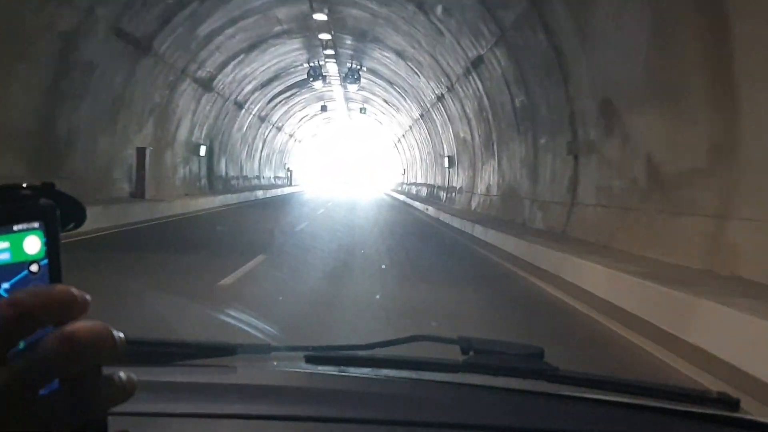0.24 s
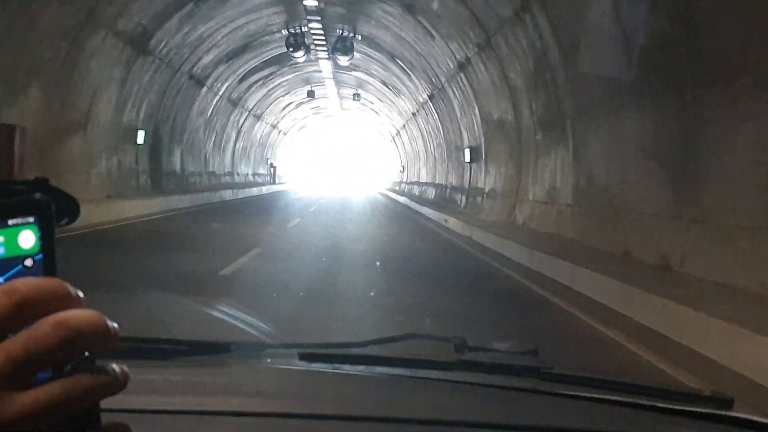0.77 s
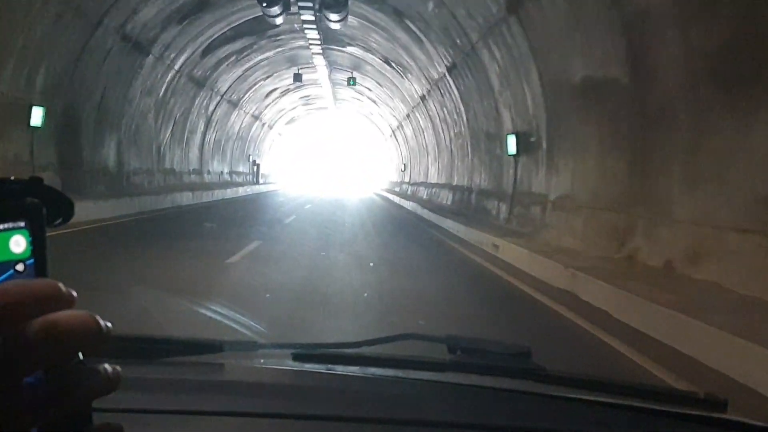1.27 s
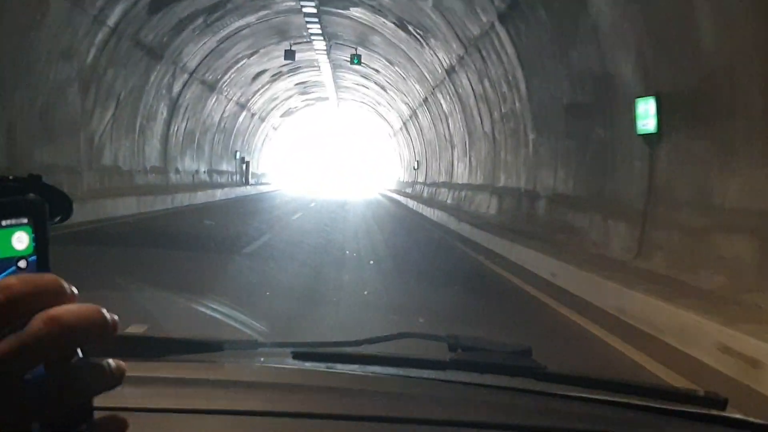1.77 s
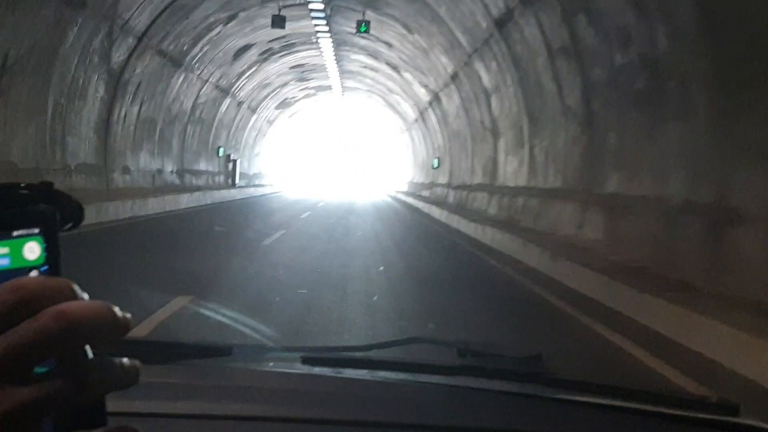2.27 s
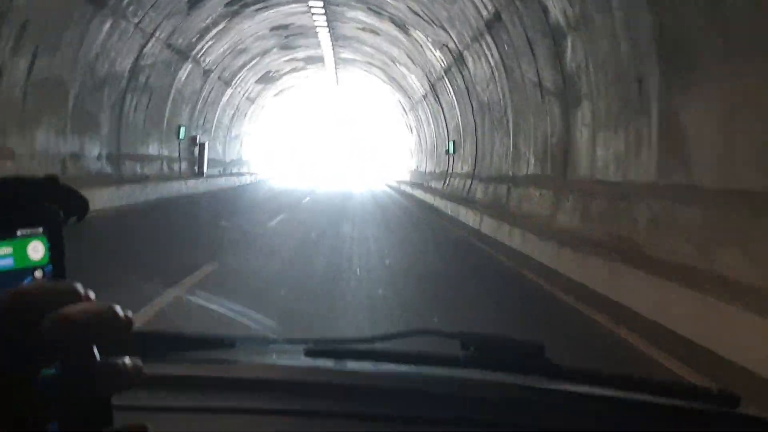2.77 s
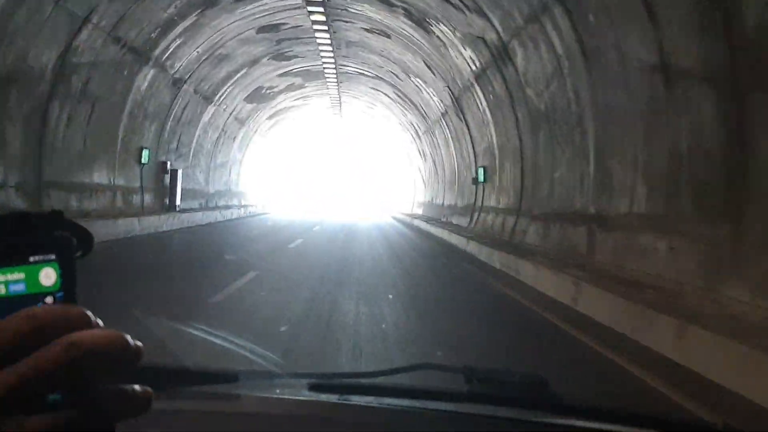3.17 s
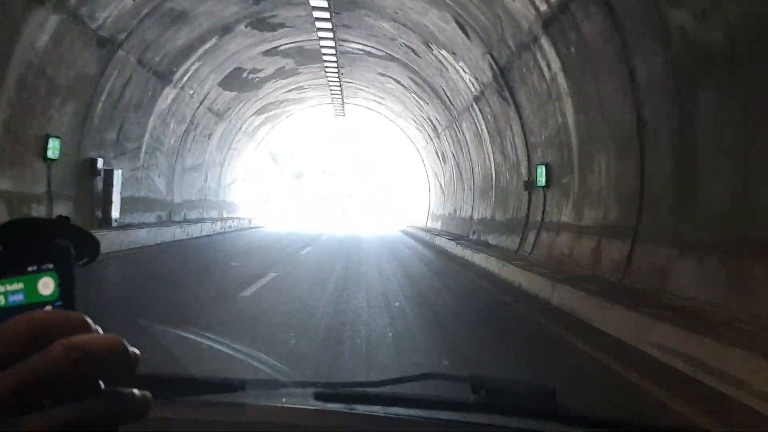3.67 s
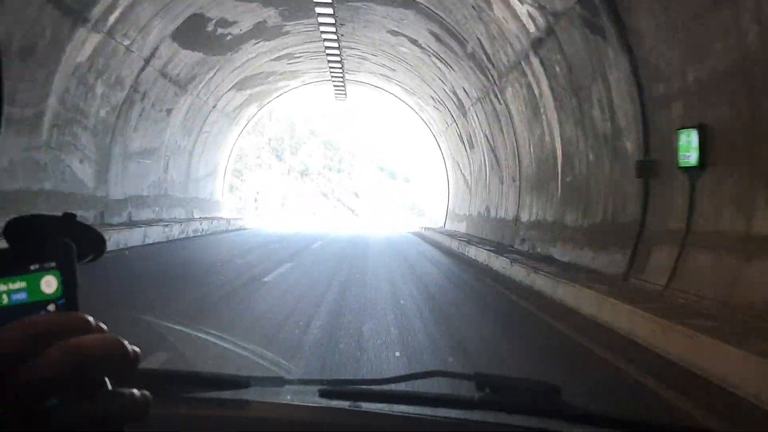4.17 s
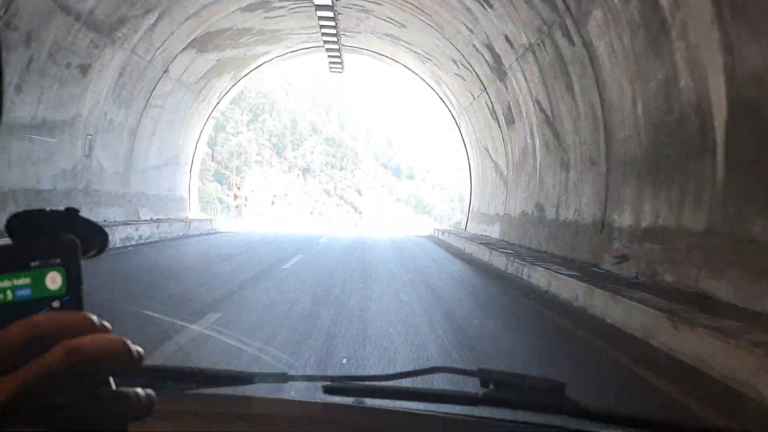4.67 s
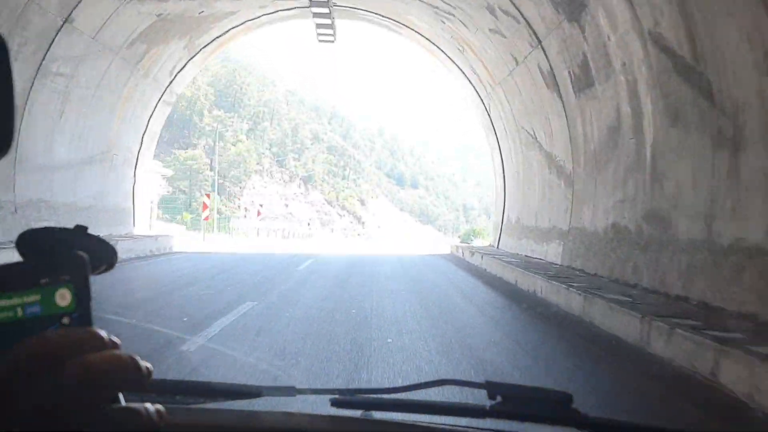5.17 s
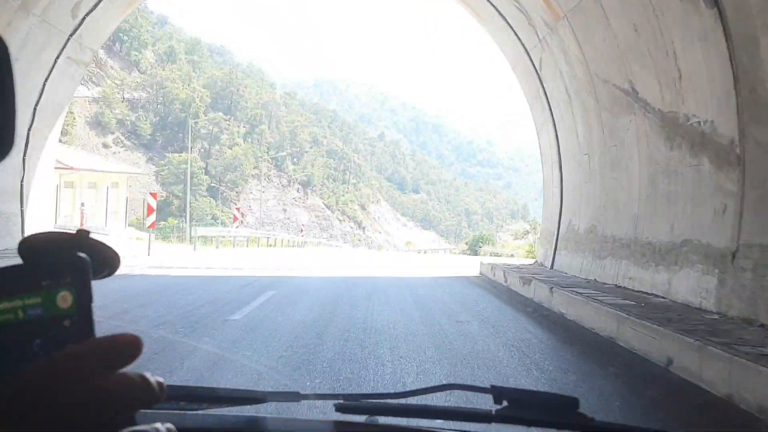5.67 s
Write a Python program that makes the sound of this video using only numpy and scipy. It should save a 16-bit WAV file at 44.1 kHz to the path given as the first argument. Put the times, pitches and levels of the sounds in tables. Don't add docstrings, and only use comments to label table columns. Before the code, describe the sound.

Inside a car in a concrete tunnel, a loud bass engine boom and tyre rumble dominate, with muffled roar and faint hiss. A tiny skin squeak comes early, then a loud dry snap on the right as the gripping hand shifts. Later the drone sinks and wavers among soft trim ticks. The overloaded stereo recorder is handheld in the cabin.

```python
import sys
import numpy as np
from scipy import signal
from scipy.io import wavfile
from scipy.ndimage import uniform_filter1d, minimum_filter1d

SR = 44100
rng = np.random.default_rng(int(sys.argv[2]) if len(sys.argv) > 2 else 0)


def bounce(signal):
    frames = np.transpose(np.atleast_2d(signal))
    limited = np.clip(frames, -1, 1)
    pcm = np.round(limited * 32767).astype(np.int16)
    wavfile.write(sys.argv[1], SR, pcm)


def gain_from_db(level_db):
    decades = np.asarray(level_db, float) / 20
    return 10 ** decades


N = 261513

# (time [s], level [dB])
ROAD_LEVEL = [(0, -.5), (.8, -1.5), (1.1, 1.5), (1.4, 0), (1.75, -1), (2.44, -1.5), (3.43, 0), (3.7, 2),
              (4.23, 3), (4.6, 0), (4.86, 0), (5.45, 2.5), (5.55, 2), (5.7, 2), (5.93, 4)]
BASS_LAG = 11


def in_time(rows):
    s, *columns = np.transpose(rows)
    return [np.interp(np.arange(N) / SR, s, c) for c in columns]


def at_hz(points, hz):
    points = np.array(points)
    return np.interp(np.log(hz), np.log(points[:, 0]), points[:, 1])


def rms_one(x):
    return x / np.sqrt(np.mean(x ** 2) + 1e-20)


def panned(x, lean_db):
    return np.array([x * gain_from_db(lean_db / 2), x * gain_from_db(-lean_db / 2)])


def drift(rate):
    r = np.exp(-80 * np.pi * rate / SR)
    noise = rng.standard_normal(N // 40 + 2002)
    slow = signal.lfilter([1], [1, -2 * r, r * r], noise)[2000:]
    return np.interp(np.arange(N) / 40, np.arange(len(slow)), rms_one(slow - slow.mean()))


def resonance(x, hz, width_hz):
    r = np.exp(-np.pi * width_hz / SR)
    poles = [1, -2 * r * np.cos(2 * np.pi * hz / SR), r * r]
    return signal.lfilter([(1 - r * r) / 2, 0, (r * r - 1) / 2], poles, x)


def port_pair(mid, side, hz):
    # (frequency [Hz], correlation [-1..1])
    likeness = [(60, 0.88), (99, 1), (160, 0.95), (270, 0.84), (450, 0.52), (740, 0.35), (1220, -0.29),
                (2010, -0.15), (3330, 0.02), (5500, -0.047), (9080, 0.04), (15000, -0.43)]
    # (frequency [Hz], left minus right [dB])
    lean = [(30, -4), (60, -4.5), (110, -4), (200, -5), (380, -2), (700, -1.7), (1290, -1.8), (2380, -1),
            (4400, -3), (8000, 1), (15000, 0)]
    alike = np.clip(at_hz(likeness, hz), -1, 1)
    pair = np.sqrt(1 + alike) * mid + np.sqrt(1 - alike) * side * [[1], [-1]]
    return pair * gain_from_db(at_hz(lean, hz) / 2 * np.array([[1], [-1]]))


def banded_noise(spectrum, gust, patchy_db, gust_db):
    out, white = 0, rng.standard_normal((2, 2, N + SR // 2))
    low_hz, top_hz = np.array(spectrum)[[0, -1], 0]
    edges = np.geomspace(low_hz, top_hz, 12)
    for k, (low, high) in enumerate(zip(edges, edges[1:])):
        band = signal.butter(2, [low, high], "band", fs=SR, output="sos")
        mid, side = signal.sosfilt(band, white[k % 2])[:, -N:]
        hz = np.sqrt(low * high)
        level_db = at_hz(spectrum, hz) + patchy_db * drift(3.7) + gust_db * gust
        out = out + gain_from_db(level_db) * port_pair(mid, side, hz)
    return rms_one(out)


def wavering_tone(hz, width_hz):
    phase = 2 * np.pi * np.cumsum(hz) / SR
    return rms_one(drift(width_hz) * np.cos(phase) + drift(width_hz) * np.sin(phase))


def left_late(pair):
    return np.array([np.roll(pair[0], BASS_LAG), pair[1]])


def engine():
    # (time [s], firing rate [Hz])
    speed = [
        (0, 80.1),
        (1.7, 80),
        (3.1, 77.64),
        (4.3, 74.8),
        (5.0, 73.52),
        (5.93, 69.39),
    ]
    # (time [s], half width [s], boom change [dB], octave change [dB])
    echo_beats = [(.3, .2, -1, -1), (1.5, 0.16, 1, 7), (1.9, 0.16, 0.5, 1.5), (2.65, 0.31, 1, -1.5),
                  (3.3, 0.064, -4, -1), (3.74, .1, -5.5, 6), (4.08, 0.1, -22, 15.5), (4.19, 0.033, -1, 10),
                  (4.31, 0.058, -7.5, 1), (4.679, 0.18, 1.5, -0.5), (4.87, 0.091, -4, 9.5),
                  (5.05, .08, -3, -10), (5.25, 0.067, -0.5, 6.5), (5.599, 0.13, -10.5, -7),
                  (5.8, 0.11, -10, 7)]
    # (time [s], left minus right [dB])
    boom_lean = [(0, -.7), (2, -.4), (3.5, -1.3), (5.93, -2.4)]
    cabin_mode_hz = 80
    hz, = in_time(speed)
    t = np.arange(N) / SR
    below_hz = cabin_mode_hz - hz
    boom_db = -7.5 - 0.3552 * below_hz
    octave_db = -31 + 0.71 * below_hz
    for s, width_s, boom_change_db, octave_change_db in echo_beats:
        beat = np.exp(-((t - s) / max(width_s, .02)) ** 2)
        boom_db = boom_db + boom_change_db * beat
        octave_db = octave_db + octave_change_db * beat
    lag = BASS_LAG * np.array([[80.], [0.]])
    phase = 2 * np.pi * (np.cumsum(hz) - lag) / SR + 0.16 * drift(15)
    lean_db = in_time(boom_lean)[0] * [[.5], [-.5]]
    boom = gain_from_db(boom_db + 3.0 + 0.17 * drift(16) + lean_db) * np.sin(phase + 1.54)
    octave_level = gain_from_db(octave_db + 2.2 + 1.2 * drift(8) + [[-2.2], [2.2]])
    octave = octave_level * np.sin(2 * phase + .3 * drift(4))
    return boom + octave


def road():
    # (frequency [Hz], density [dB per Hz])
    rumble_spectrum = [(28, -47), (34, -31.5), (42, -2.5), (52, 7), (65, -1), (85, -0.5), (110, 0.5),
                       (155, -6.5), (200, -14), (260, -27.5), (330, -41)]
    roar_spectrum = [(170, -16.5), (230, -0.5), (290, -0.5), (380, -5.5), (500, -10.5), (800, -15.5),
                     (1200, -21.5), (1800, -28), (2500, -46), (3300, -58)]
    hiss_spectrum = [(1700, -9.5), (2400, 0), (3300, -3), (4400, -4.5), (5500, -9), (7000, -12),
                     (8500, -12.5), (11000, -18), (13000, -16.5), (15000, -17), (17500, -20)]
    # (frequency [Hz], width [Hz], level [dB])
    panels = [(126.2, 14, -29.5), (269, 23, -35), (322.7, 10, -34.5), (445, 33, -39)]
    road_level_db, = in_time(ROAD_LEVEL)
    rumble_db = -17.5 + 1.2 * road_level_db
    roar_db = -30 + 0.81 * road_level_db
    hiss_db = -53.5 + 1.3 * road_level_db
    gust = drift(30)
    body = gain_from_db(rumble_db + 4.0) * banded_noise(rumble_spectrum, gust, patchy_db=2.16, gust_db=-1.08)
    for hz, width_hz, level_db in panels:
        shaken = resonance(rng.standard_normal((2, N)), hz, width_hz)
        mid, side = resonance(shaken, hz, width_hz)
        body += gain_from_db(level_db + rumble_db - rumble_db.mean()) * rms_one(port_pair(mid, side, hz))
    roar = gain_from_db(roar_db + 4.0) * banded_noise(roar_spectrum, gust, patchy_db=1.7, gust_db=0.4)
    hiss = gain_from_db(hiss_db + 2.5) * banded_noise(hiss_spectrum, gust, patchy_db=.5, gust_db=.3)
    return left_late(body) + roar + hiss


def snaps():
    # (time [s], peak [dB], t60 [s], left minus right [dB])
    snap_events = [
        (2.321, -39, .008, 0),
        (2.3275, -25, .02, -25),
        (2.339, -25, .01, -25),
        (2.343, -25, .012, -25),
        (2.3502, -10, .006, -30),
        (2.3525, -15, .015, -30),
        (2.3565, 11, .004, -30),
        (2.3575, 19, .004, -28),
        (2.363, -4, .01, -30),
        (2.367, -5, .01, -30),
    ]
    out, t = np.zeros((2, N)), np.arange(SR // 12) / SR
    for s, peak_db, t60, lean_db in snap_events:
        decay = gain_from_db(-60 * t / t60) + gain_from_db(-35 - 60 * t / .12)
        crack = rng.standard_normal(len(t)) * decay * np.minimum(t / .0003, 1)
        crack[12] += 3
        hollow = 4.5 * resonance(crack, 650, 900)
        dips = .7 * resonance(crack, 2800, 3500) + .1 * resonance(crack, 14000, 3000)
        crack = crack + hollow - dips
        i = round(s * SR)
        out[:, i:i + len(t)] += gain_from_db(peak_db) * crack / abs(crack).max() * gain_from_db([[lean_db], [0]])
    return out


def squeak():
    start_s, attack_s, length_s = 1.12, 0.022, 0.2
    level_db, fade_db_s = -54, 59
    start_hz, rest_hz, sag_s = 7100, 6500, .06
    t = np.maximum(np.arange(N) / SR - start_s, 0)
    hz = rest_hz + (start_hz - rest_hz) * np.exp(-t / sag_s)
    shape = np.minimum(t / attack_s, 1) * np.clip((length_s - t) / .06 + 1, 0, 1)
    haze = resonance(rng.standard_normal(N), 13900, 2200)
    haze = rms_one(resonance(haze, 13900, 2200))
    slips = wavering_tone(hz, width_hz=380) + gain_from_db(-7) * haze
    fading_db = level_db - fade_db_s * np.minimum(t, 1) + 1.1 * drift(40)
    return panned(shape * gain_from_db(fading_db) * slips, -13.0)


def ticks():
    # (time [s], peak [dB], ring [Hz], left minus right [dB])
    tick_events = [
        (3.306, -36, 3040, 0),
        (3.71, -37, 3000, 5.5),
        (4.357, -31.5, 6454, -4),
        (4.682, -32.5, 3568, -6),
        (4.688, -30, 4130, -0.5),
        (5.1248, -31.5, 5150, -0.5),
        (5.558, -34, 6500, 1),
        (5.77, -34.5, 4600, -1.5),
    ]
    out, t = np.zeros((2, N)), np.arange(SR // 25) / SR
    for s, peak_db, hz, lean_db in tick_events:
        burst = rng.standard_normal((2, len(t))) * gain_from_db(-60 * t / 0.058) * np.minimum(t / 0.0011, 1)
        modes = 2.2 * resonance(burst, 1950, 500) + 1.3 * resonance(burst, 3150, 400)
        modes = modes + 2.5 * resonance(burst, 1100, 600)
        ring = resonance(resonance(burst, hz, 0.6 * hz), hz, 0.6 * hz)
        tick = ring + modes
        i = round(s * SR)
        lean = gain_from_db([[lean_db / 2], [-lean_db / 2]])
        out[:, i:i + len(t)] += gain_from_db(peak_db) * tick / abs(tick).max() * lean
    return out


def whistle():
    start_s, rise_s = 2.5, .45
    opened = np.clip((np.arange(N) / SR - start_s) / rise_s, 0, 1) ** 2
    level_db = -67.5 + in_time(ROAD_LEVEL)[0] + 1.5 * drift(7)
    tone = wavering_tone(4250 + 110 * drift(.6), width_hz=130)
    return panned(opened * gain_from_db(level_db) * tone, -8)


def scene():
    return engine() + road() + snaps() + squeak() + ticks() + whistle()


def grip(right):
    # (frequency [Hz], width [Hz], gain added on top [ratio])
    hollow_before = [(7900, 1300, .8), (14300, 2000, .6)]
    hollow_after = [(3340, 1000, 0.046), (4320, 520, 0.21), (8640, 1100, -0.48), (14000, 2000, -.25)]
    before = sum(gain * resonance(right, hz, width_hz) for hz, width_hz, gain in hollow_before)
    after = sum(gain * resonance(right, hz, width_hz) for hz, width_hz, gain in hollow_after)
    shift_s = 2.375
    moved = np.clip((np.arange(N) / SR - shift_s) / .03, 0, 1)
    return (1 - moved) * before + moved * after


def limiter(x):
    limit_db, release_db_s, attack_s = -2.5, 300, 0.0051
    ramp = release_db_s * np.arange(N) / SR
    over_db = np.maximum(20 * np.log10(abs(x).max(axis=0) + 1e-9) - limit_db, 0)
    held_db = np.maximum.accumulate(over_db + ramp) - ramp
    span = max(round(attack_s * SR), 3)
    cut_db = uniform_filter1d(-minimum_filter1d(-held_db, span), span)
    return gain_from_db(0.1 - limit_db - cut_db) * x


def top_cut(x):
    return signal.sosfilt(signal.butter(12, 15700, fs=SR, output="sos"), x)


def record(dry):
    fade_in = np.minimum(np.arange(N) / 200, 1)
    x = np.array([dry[0], dry[1] + grip(dry[1] * fade_in)])
    x = x - 0.62 * resonance(x * fade_in, 9650, 1500)
    top_hz = 15450
    low_pass = signal.cheby2(8, 30, top_hz * 1.04, fs=SR, output="sos")
    x = signal.sosfiltfilt(low_pass, x)
    return top_cut(limiter(x))


dry = scene()
out = record(dry)
bounce(out)
```